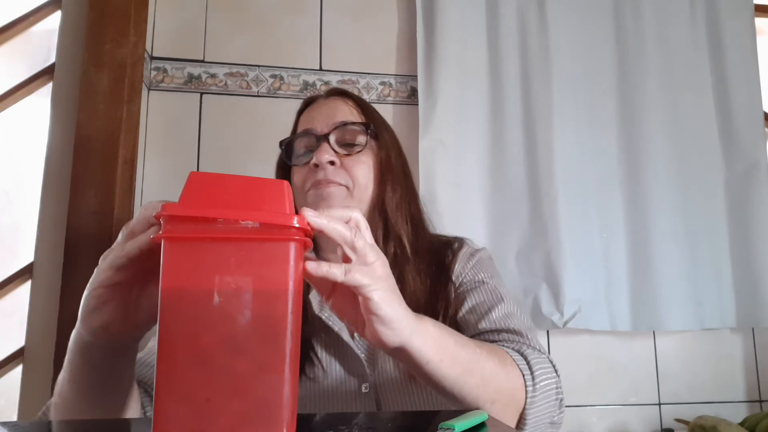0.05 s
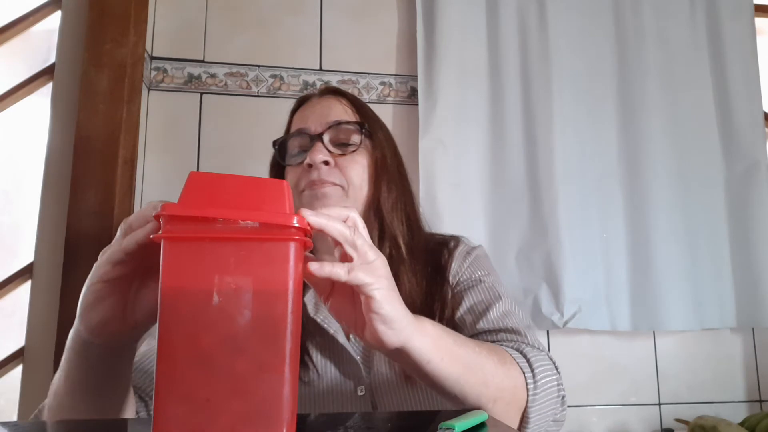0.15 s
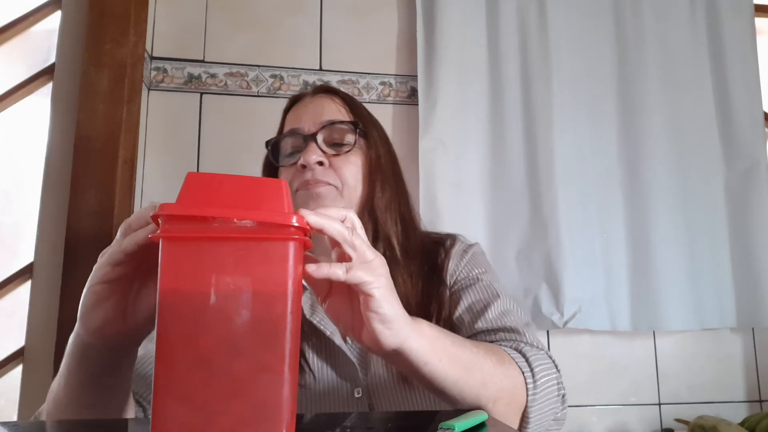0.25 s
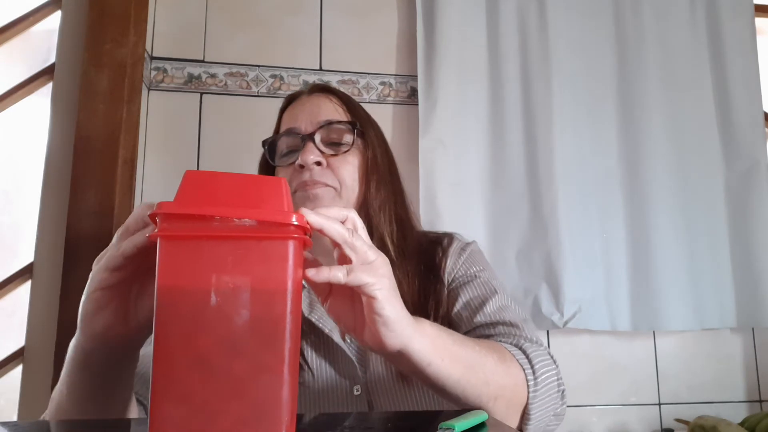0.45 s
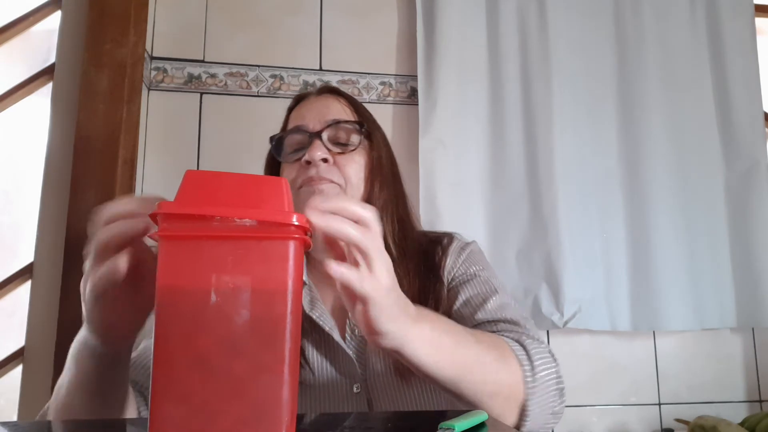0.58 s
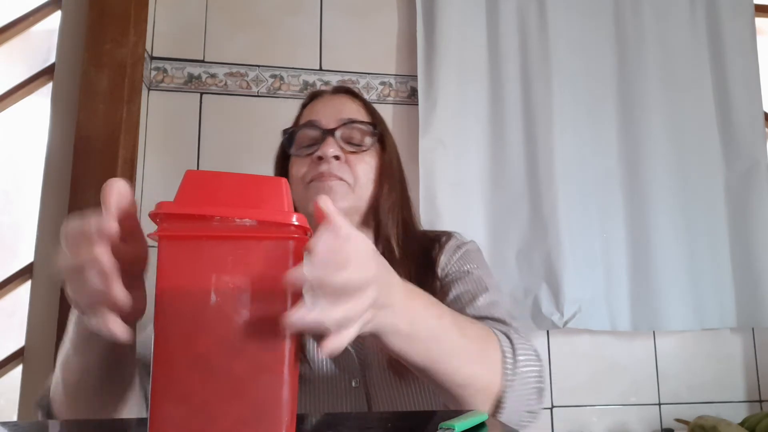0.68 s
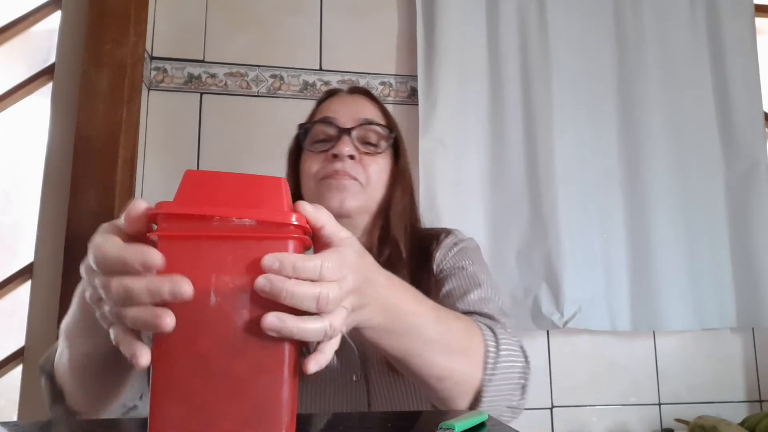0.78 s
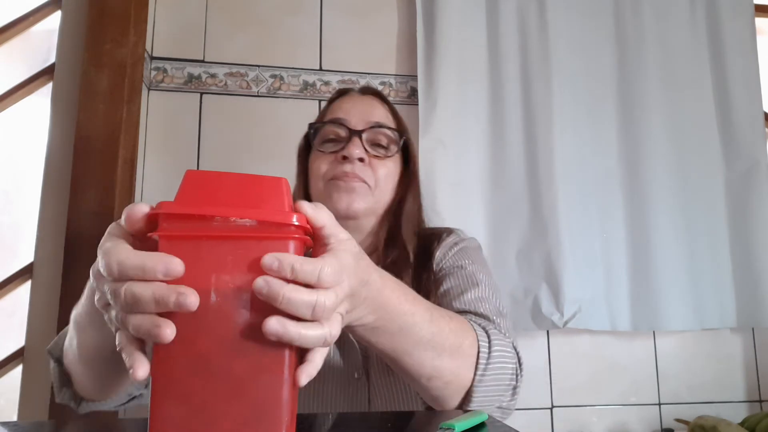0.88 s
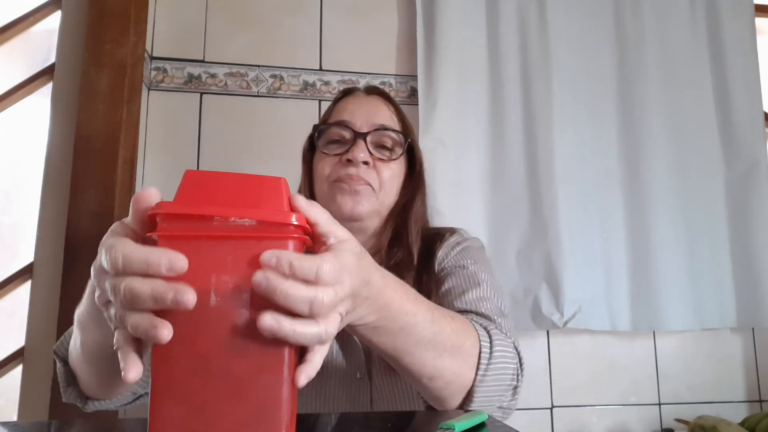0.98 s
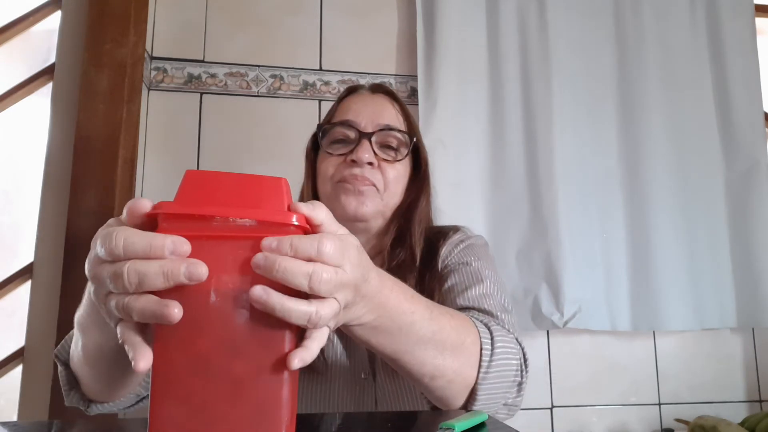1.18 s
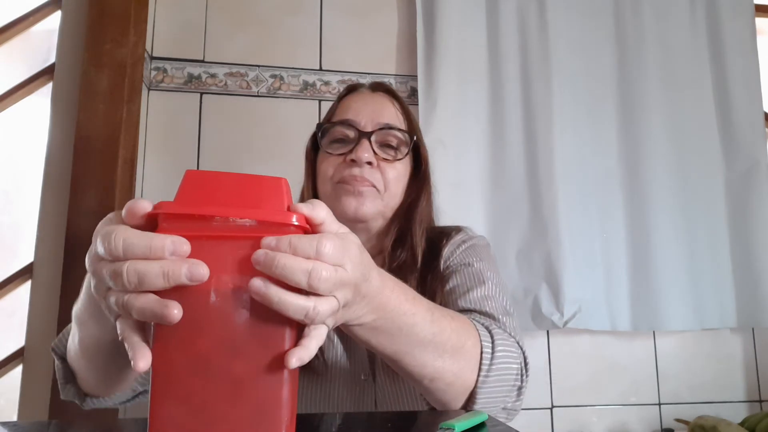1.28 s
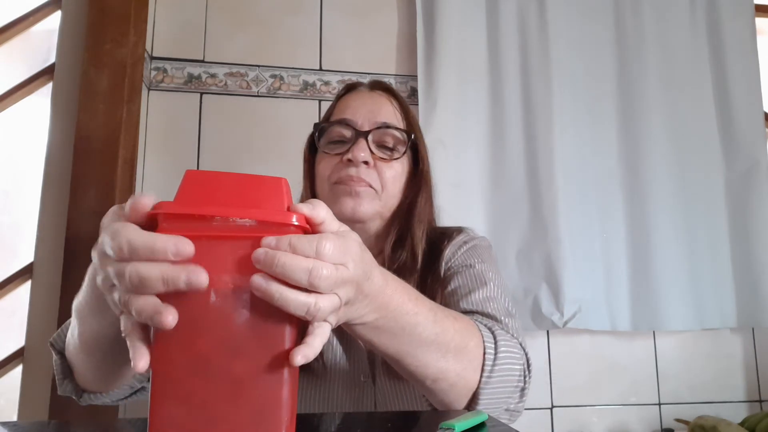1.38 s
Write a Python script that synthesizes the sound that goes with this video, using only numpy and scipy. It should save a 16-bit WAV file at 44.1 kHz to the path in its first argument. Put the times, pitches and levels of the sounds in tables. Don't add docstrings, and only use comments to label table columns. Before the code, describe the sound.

One sharp, boomy snap of a plastic container lid, room echo, then faint handling taps and rubs

```python
import sys
import numpy as np
from scipy import signal
from scipy.io import wavfile
from scipy.ndimage import uniform_filter1d

SR = 44100
rng = np.random.default_rng(int(sys.argv[2]) if len(sys.argv) > 2 else 0)


def int16_out(signal):
    q = np.round(np.clip(np.atleast_2d(signal).T, -1, 1) * 32767)
    wavfile.write(sys.argv[1], SR, q.astype(np.int16))


def invert_db(x):
    u = np.asarray(x, float) / 20
    return 10 ** u


N = 63945
FLOOR_PAN_DB, ROOM_PAN_DB = -2.5, -2.5
LEAD = 200
KNOCK_N = SR // 8


def unit(x):
    return x / np.sqrt(np.mean(x ** 2))


def pan(db):
    return invert_db(np.array([[db], [-db]]) / 2)


def band(x, hz, width_hz):
    return signal.lfilter(*signal.iirpeak(hz, hz / width_hz, SR), x)


def steep_band(x, hz, width_hz):
    return band(band(x, hz, width_hz), hz, width_hz)


def pair(alike):
    alike = np.clip(alike, 0, 1)
    mid, side = rng.standard_normal((2, N))
    return np.sqrt((1 + alike) / 2) * mid + np.sqrt((1 - alike) / 2) * side * np.array([[1], [-1]])


def walk(rate_hz):
    k = int(SR / rate_hz)
    steps = np.repeat(rng.standard_normal(N // k + 1), k)
    return unit(uniform_filter1d(uniform_filter1d(steps, k), k)[:N])


def fade(t, t60):
    return (t >= 0) * np.exp(-np.log(1000) * np.maximum(t, 0) / t60)


def sine(t, hz, phase=0):
    return np.sin(2 * np.pi * hz * t + phase)


def octaves(hz, table, col):
    table = np.array(table)
    return np.interp(np.log(hz), np.log(table[:, 0]), table[:, col])


def pushed(body, contact_ms):
    push = np.exp(-.5 * (np.arange(-LEAD, LEAD) / SR / (contact_ms / 4000)) ** 2)
    return signal.fftconvolve(body, push[None] / push.sum())[:, :body.shape[1]]


# pitch_hz, level_db
HOUSE_COLOUR = [(150, 0), (500, -13), (800, -16), (1200, -29), (2100, -28), (2700, -40), (5000, -34),
                (8500, -38), (13000, -32)]


def house_noise():
    air = 0
    for hz in 170 * 2 ** (np.arange(20) / 3):
        noise = steep_band(pair(np.exp(-(hz / 450) ** 2)), hz, hz / 3)
        level_db = octaves(hz, HOUSE_COLOUR, 1) + 1.5 * walk(8)
        air = air + invert_db(level_db) * np.sqrt(hz) * unit(noise)
    return invert_db(-62.5) * unit(air) * pan(FLOOR_PAN_DB)


# pitch_hz, level_db, then wobble_db (first row) or width_hz (the others)
FRIDGE = [
    (59, -57, 1.5),
    (121, -58, 22),
    (140, -63, 25),
]
# start_s, level_db, third_of_t60_s
FIRST_THUD = (.0, -54, .04)


def fridge_and_bump(t):
    hum = sum(invert_db(db) * unit(steep_band(pair(1.0), hz, width_hz)) for hz, db, width_hz in FRIDGE[1:])
    hz, db, wobble_db = FRIDGE[0]
    hum = hum + invert_db(db + wobble_db * walk(7)) * np.sqrt(2) * sine(t, hz, .5 * walk(6))
    start_s, db, t60 = FIRST_THUD
    bump = invert_db(db) * fade(t - start_s, t60 * 3) * unit(steep_band(pair(.9), 140, 200))
    return (hum + bump) * pan(-3)


# start_s, rise_s, hold_s, fall_s, level_db
RUBS = [
    (.53, .1, .05, .10, -68),
    (1.31, .05, .05, .03, -72),
    (1.398, .024, .012, .06, -55),
    (.578, .002, .002, .005, -57.5),
    (-.01, .01, .015, .06, -71),
    (.04, .04, .04, .1, -79),
]
# pitch_hz, width_hz, level_db
RUB_TONES = [
    [(13900, 500, 0), (12300, 2600, 1)],
    [(7000, 1200, 0), (5000, 1500, -4), (1400, 600, 0)],
    [(700, 200, -4), (1400, 380, 0), (1950, 200, -5), (3600, 500, -15), (4900, 500, -12), (7300, 800, -13),
     (13000, 5000, -15)],
    [(1700, 900, 0), (4500, 1500, 0), (6500, 1500, -2)],
    [(900, 500, 2), (3700, 900, -2), (4900, 700, 0), (6800, 1500, -1)],
    [(2180, 120, 0)],
]


def rubs(t):
    out = 0
    for (start_s, rise_s, hold_s, fall_s, db), tones in zip(RUBS, RUB_TONES):
        shape = np.interp(t, np.cumsum([start_s, rise_s, hold_s, fall_s]), [0, 1, 1, 0]) ** 2
        grit = pair(.2) * invert_db(2.5 * walk(120))
        tone = sum(invert_db(g) * unit(steep_band(grit, hz, 1.5 * width_hz)) for hz, width_hz, g in tones)
        out = out + invert_db(db) * shape * unit(tone)
    return out * pan(FLOOR_PAN_DB)


# middle_s, level_db, width_ms
GIVE = (0.2385, -18, 0.67)


def give(t):
    middle_s, db, width_ms = GIVE
    u = (t - middle_s) / (width_ms / 1000)
    return invert_db(db) * u * np.exp(.5 - .5 * u ** 2) * pan(ROOM_PAN_DB)


# pitch_hz, level_db, t60_s, left_right_db
TUB = [(133.4, -10.5, 0.086, 8), (194, 0.5, 0.03, 7), (269, -9, 0.025, -9), (369.3, -4, 0.066, -4),
       (640, -19, 0.059, -6), (764, 4, 0.024, -1), (828, -16, 0.065, -9), (1069, -19.5, 0.088, 9.5),
       (1397, -5, 0.013, -12), (1900, -10, 0.0141, 12), (2025, -11, 0.041, 3.5), (2420, -46.5, 0.013, 1)]


def tub_body(u):
    body = sum(invert_db(db) * pan(p) * fade(u, t60) * sine(u, hz, 0.9) for hz, db, t60, p in TUB) / 3
    return signal.sosfilt(signal.butter(2, 100, "high", fs=SR, output="sos"), body)


# pitch_hz, width_hz, level_db
RIM = [(1885, 930, -3.5), (4000, 2300, 5), (5820, 1800, 1.5), (7200, 1000, 7.5), (10830, 9970, 4),
       (12800, 6000, 7.5)]


def rim(x):
    return sum((-1) ** k * invert_db(db) * band(x, hz, width_hz) for k, (hz, width_hz, db) in enumerate(RIM))


# start_s, boom_db, crack_db, left_right_db, contact_ms
HITS = [
    (0.2397, -15, -19.5, -12, 1.0),
    (0.2400, -1.5, -17.5, -7.5, 0.65),
    (0.2429, -33.5, -27, -6.5, 0.76),
]
SNAP_S = HITS[1][0]


def hits(t):
    out, around = np.zeros((2, N)), np.zeros(N)
    u = t[:KNOCK_N]
    body = tub_body(u)
    for start_s, boom_db, crack_db, pan_db, contact_ms in HITS:
        boom = invert_db(boom_db) * pushed(body, contact_ms)
        grit = rng.standard_normal((2, len(u)))
        crack = rim(grit * fade(u - u[LEAD], np.log(1000) * .002))
        i = int(start_s * SR) - LEAD
        out[:, i:i + len(u)] += pan(pan_db) * (boom + invert_db(crack_db) * crack)
        around[i:i + len(u)] += boom.mean(0)
    click = 1. * (np.arange(N) == int(SNAP_S * SR))
    return out, around + invert_db(-2) * rim(click)


# pitch_hz, level_db, t60_s
PANELS = [
    (2008, -23.5, .03),
    (4265, -32, 0.024),
    (13530, -28.5, 0.02),
]


def panels(t):
    u = t - SNAP_S
    return pan(ROOM_PAN_DB) * sum(invert_db(db) * fade(u, t60) * sine(u, hz) for hz, db, t60 in PANELS)


# pitch_hz, level_db, left_right_likeness (0 to 1)
ROOM = [(78, -10.5, .97), (188.3, 0, 0.96), (390, -2, 0.66), (530, -6, .3), (788, -2.5, .05),
        (2800, 10.5, .02), (9000, 6.5, 0.016), (15220, 3, .02)]
# pitch_hz, t60_s
ROOM_T60 = [(80, .45), (180, .43), (350, .44), (800, .47), (2000, .47), (4500, .45), (8000, .39),
            (13000, .27)]


def room(dry, t):
    echo = 0
    for hz in 60 * 2 ** (np.arange(17) / 2):
        t60 = octaves(hz, ROOM_T60, 1)
        dying = fade(t, t60) + invert_db(-25) * fade(t, 2.6 * t60)
        noise = band(pair(octaves(hz, ROOM, 2)), hz, hz / 2.8)
        echo = echo + invert_db(octaves(hz, ROOM, 1)) * noise * dying
    rise_s = 0.0072
    echo = echo * (1 - np.exp(-(t / rise_s) ** 2)) / np.sqrt(SR * 0.052)
    return invert_db(1) * pan(ROOM_PAN_DB) * signal.fftconvolve(dry, echo, axes=1)[:, :N]


# pitch_hz, level_db, t60_s
RINGS = [(110.1, -33, .4), (135.7, -32.5, 0.77), (178.3, -21, 0.31), (205.8, -26.5, .42),
         (257.8, -31, 0.46), (378.6, -23.5, 0.29), (404.8, -34.5, 0.46), (436.6, -30, 0.38),
         (716.4, -43, .7), (782, -35, 0.27), (857, -28.5, .42), (954.4, -33, 0.34), (1073, -39, .38)]


def rings(t):
    u = t - SNAP_S
    out = 0
    for hz, db, t60 in RINGS:
        phase = rng.uniform(0, 2 * np.pi) + rng.standard_normal((2, 1)) * hz / 600
        out = out + invert_db(db) * fade(u, t60) * sine(u, hz, phase)
    swell = 1 - np.exp(-np.maximum(u, 0) / 0.0029)
    return pan(ROOM_PAN_DB) * swell * out


# start_s, level_db, contact_ms
TAPS = [(0.581, -49, .4), (0.596, -47, 1.5), (0.786, -49, 1.5), (0.8466, -41, .35), (0.8481, -43, .5),
        (0.8508, -36, .7), (0.8715, -44, 1.5), (0.985, -41, 1.6), (1.0763, -44, .45), (1.0806, -39, .7),
        (1.0818, -38, 1.2), (1.139, -45, 1.2)]
# pitch_hz, level_db, t60_s
WALL = [(150, 1, .03), (245, 1, .02), (420, 0, .018), (640, 0, .015), (820, -2, .015), (1120, -3, .015),
        (1450, -3, .013), (2150, -5, .01)]


def taps(t):
    out, u = np.zeros(N), t[:KNOCK_N]
    for start_s, db, contact_ms in TAPS:
        grip = 1 + .08 * rng.standard_normal(len(WALL))
        wall = -sum(invert_db(g) * fade(u, t60) * sine(u, hz * k) for (hz, g, t60), k in zip(WALL, grip)) / 2
        i = int(start_s * SR) - LEAD
        out[i:i + len(u)] += invert_db(db) * pushed(wall[None], contact_ms)[0]
    return out


def scene():
    t = np.arange(N) / SR
    lid, around = hits(t)
    knocks = taps(t)
    background = house_noise() + fridge_and_bump(t) + rubs(t)
    direct = give(t) + lid + panels(t) + knocks * pan(-2.5)
    echoes = room((around + invert_db(-1.5) * knocks)[None], t) + rings(t)
    return background + direct + echoes


def band_limit(x):
    return signal.sosfilt(signal.butter(12, 17060, fs=SR, output="sos"), x)


def record(dry):
    x = dry - .45 * band(dry, 9000, 3000)
    x = signal.sosfilt(signal.butter(4, 48, "high", fs=SR, output="sos"), x)
    x = np.tanh(.8 * x) / .8
    x = signal.sosfilt(signal.ellip(8, .3, 32, 15750, fs=SR, output="sos"), x)
    return band_limit(x)


dry = scene()
out = record(dry)
int16_out(out)
```